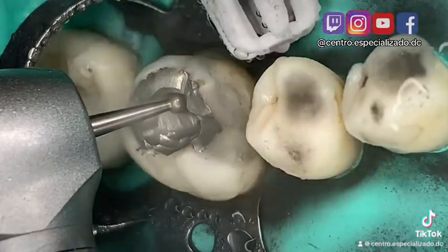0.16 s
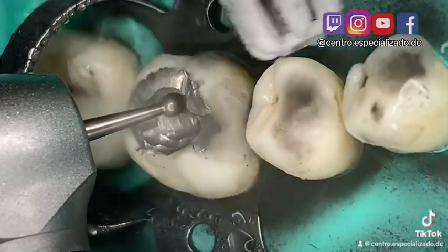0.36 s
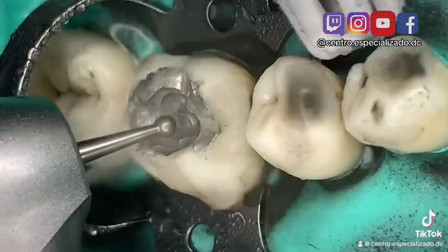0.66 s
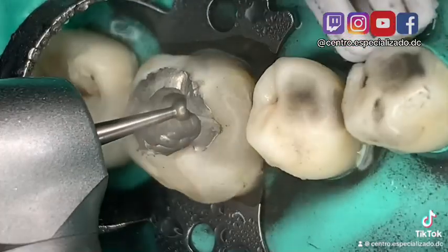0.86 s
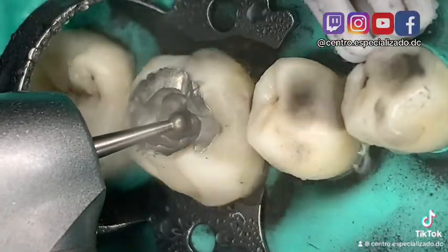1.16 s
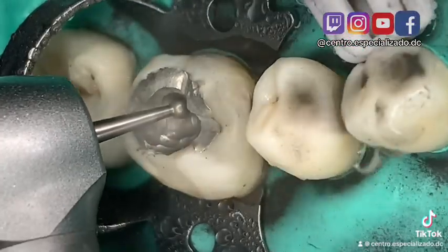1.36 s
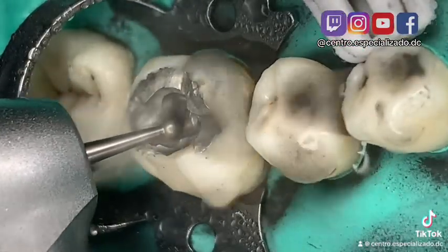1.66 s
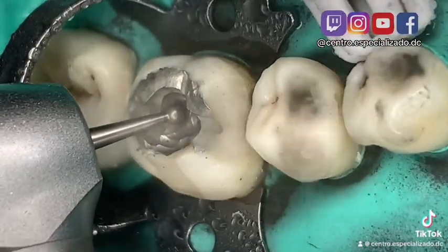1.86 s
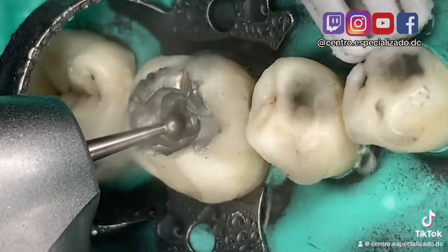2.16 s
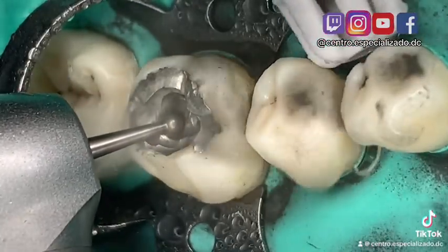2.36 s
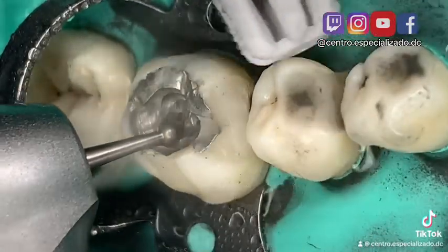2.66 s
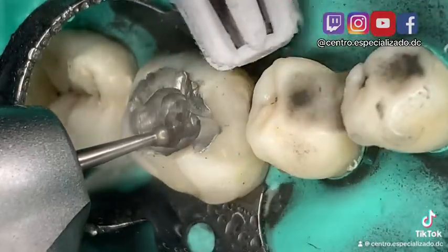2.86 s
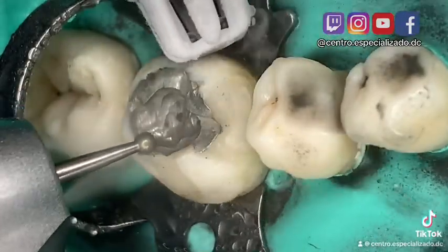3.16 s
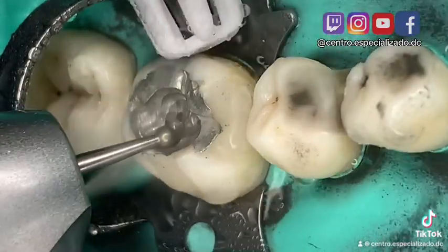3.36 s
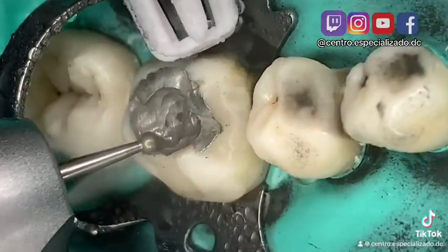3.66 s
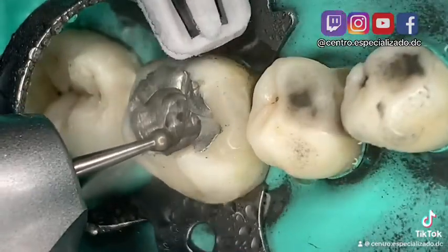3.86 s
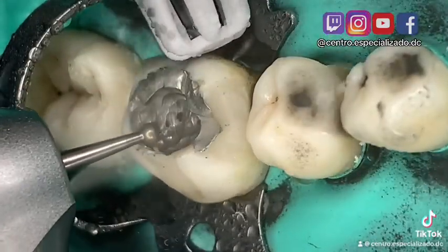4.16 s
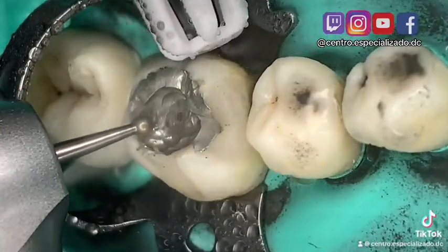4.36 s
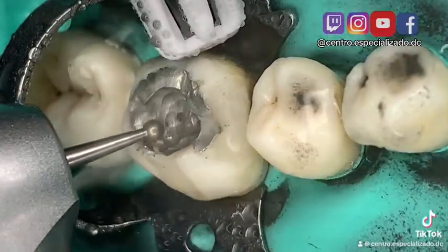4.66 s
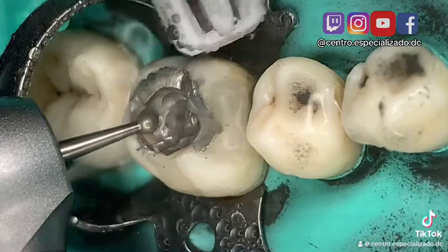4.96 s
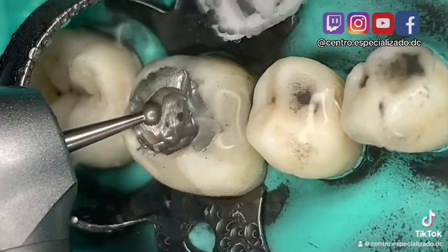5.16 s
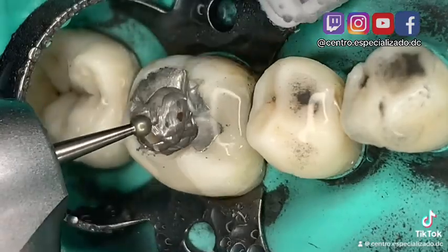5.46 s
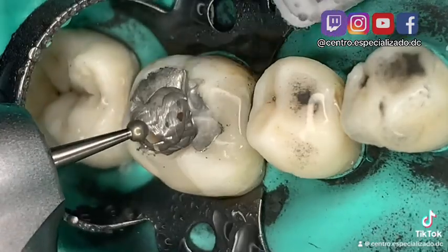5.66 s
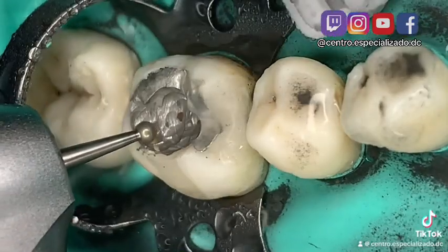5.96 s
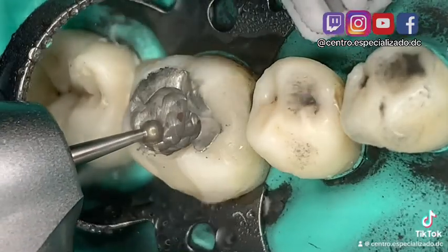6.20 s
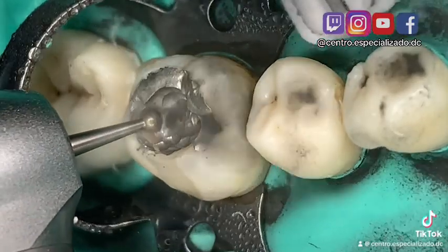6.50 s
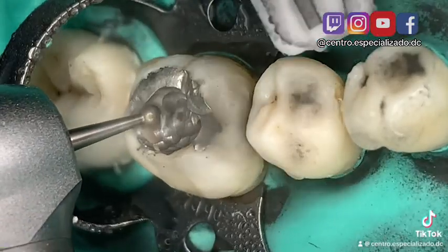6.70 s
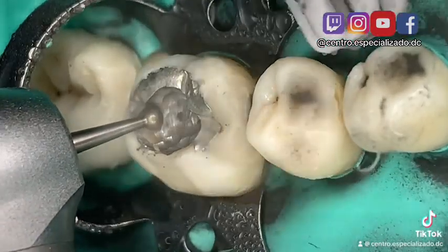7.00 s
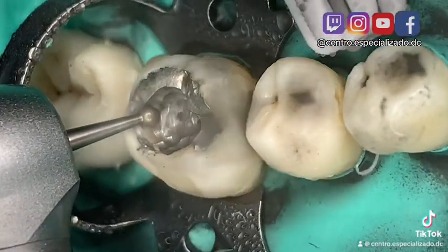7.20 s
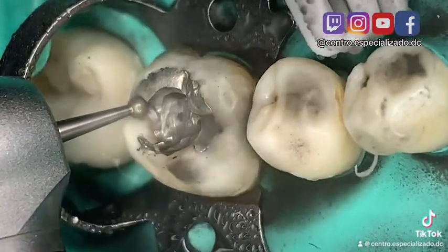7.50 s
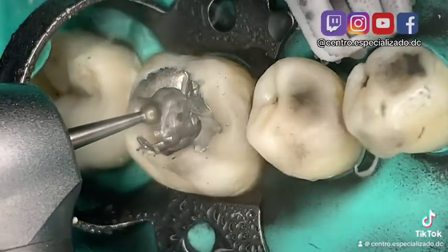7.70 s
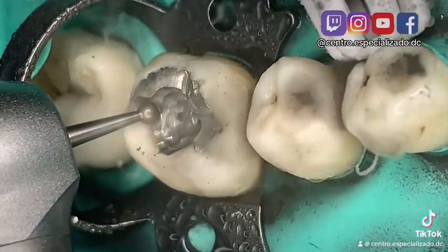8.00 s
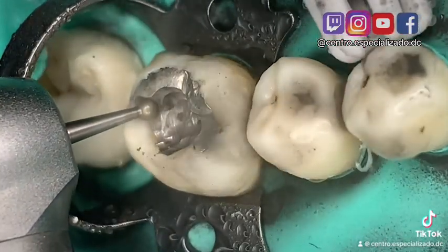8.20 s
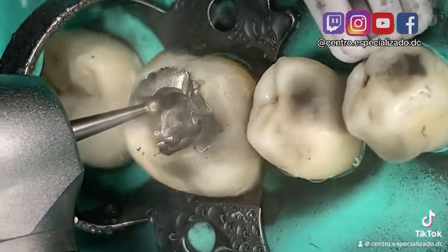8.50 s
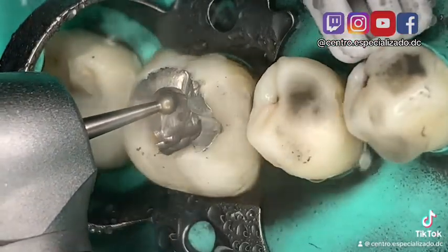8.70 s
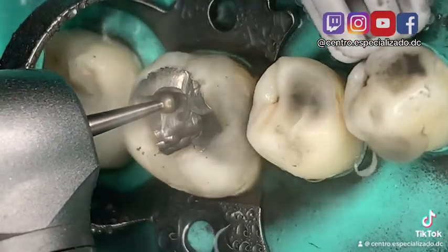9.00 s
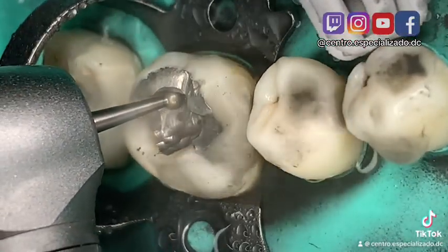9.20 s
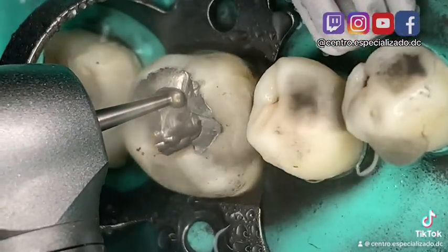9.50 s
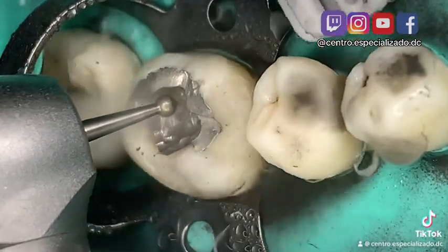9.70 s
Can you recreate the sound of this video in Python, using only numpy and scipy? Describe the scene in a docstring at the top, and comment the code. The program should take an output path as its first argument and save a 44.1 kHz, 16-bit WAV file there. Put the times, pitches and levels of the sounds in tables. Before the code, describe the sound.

Close stereo sound of a dental air turbine grinding a metal filling in a clinic. A very high thin whine dips and rises with each stroke over bright spray hiss. Near five seconds pitch and hiss sag together, then surge back louder. A suction tip slurps wetly with small snaps, and a faint machine hum stays low behind.

```python
"""A high whine sags and recovers over a bright hiss, with wet slurps, small snaps and a low hum behind it.
A dental air turbine grinds an old filling out of a molar, heard close by in stereo.
The rotor whines once a turn, slows with each stroke of the bur, coasts down when the pedal is eased and
spins up again. Shaped noise makes the air and water spray and the rush of air leaving the rotor.
Random drops ring the suction tip and its tube; sine waves make the machine hum and the soft bumps."""
import sys
import numpy as np
from scipy import signal
from scipy.fft import rfft, irfft
from scipy.io import wavfile
from scipy.ndimage import uniform_filter1d, map_coordinates

SR = 44100
rng = np.random.default_rng(int(sys.argv[2]) if len(sys.argv) > 2 else 0)


def file_out(sig):
    """Save sig as 16-bit WAV at sys.argv[1]."""
    # one column per channel
    cols = np.atleast_2d(sig).T
    # limit, then scale
    lim = np.clip(cols, -1, 1)
    pcm = np.round(lim * 32767).astype(np.int16)
    wavfile.write(sys.argv[1], SR, pcm)


N = 434385
TIME = np.arange(N) / SR  # seconds
FREQ = np.maximum(np.fft.rfftfreq(N, 1 / SR), 1)  # Hz, kept above zero for logs and divisions

# cooling air and water jet, which sags and surges with the pedal; each user adds its own offset:
# (time [s], level [dB])
JET_LEVEL = [(0, -33), (3.2, -33), (4.75, -35.5), (5.13, -42.5), (5.45, -46), (5.61, -42.5), (5.79, -37),
             (6.37, -26.5), (6.9, -28.5), (7.6, -29.5), (8.6, -31.5), (9.85, -31.5)]
# water drawn into the suction tip: (time [s], level [dB])
SUCTION_LEVEL = [(0, -57.5), (4.3, -57.5), (5.4, -60.5), (5.9, -53), (6.55, -49.5), (6.85, -51.5),
                 (7.7, -53.5), (7.9, -55.5), (9.85, -55)]


def undb(db):
    """Turn decibels into a gain."""
    return 10 ** (np.asarray(db) / 20)


def unit(x):
    """Scale to an rms of 1."""
    return x / np.sqrt(np.mean(x ** 2))


def curve(rows):
    """Join (time, value) rows by straight lines."""
    return np.interp(TIME, *np.transpose(rows))


def shape(rows):
    """Gain at every frequency from (Hz, dB) rows, joined on a logarithmic pitch scale."""
    hz, db = np.transpose(rows)
    return undb(np.interp(np.log(FREQ), np.log(hz), db))


def filtered(x, response):
    """Apply a frequency response."""
    return irfft(rfft(x) * response, N)


def resonances(modes):
    """Add up resonances from (Hz, width Hz, dB) rows, with alternating sign."""
    total = 0
    for k, (hz, width, db) in enumerate(modes):
        detune = (FREQ / hz - hz / FREQ) * hz / width
        total = total + (-1) ** k * undb(db) / (1 + 1j * detune)
    return total


def walk(rate):
    """Smooth random wandering of rms 1 that changes about rate times a second."""
    steps = rng.standard_normal(8192)
    # work out every 16th sample and hold it
    coarse = map_coordinates(steps, [TIME[::16] * rate], order=3, mode="wrap")
    return unit(coarse.repeat(16)[:N])


def droplets(rate, spread_db):
    """Two rows of random impacts, rate per second, a few of them much larger than the rest."""
    size = undb(spread_db * np.minimum(rng.exponential(size=(2, N)), 5))
    lands = rng.random((2, N)) < rate / SR
    return unit(lands * size * rng.choice([-1, 1], (2, N)))


def strikes(rows, response):
    """One impulse per (time s, peak dB) row, rung through a response."""
    hits = np.zeros(N)
    for s, db in rows:
        hits[int(s * SR)] += undb(db)
    ring_peak = np.abs(irfft(response, N)).max()
    return filtered(hits, response) / ring_peak


def swells(rows):
    """Sum of flat-topped swells from (time s, half length s, level dB, ..) rows."""
    total = 0
    for s, length, db, *_ in rows:
        age = (TIME - s) / length
        total = total + undb(db) * np.exp(-age ** 4 / 2)
    return total


def stereo(main, second=None):
    """Place a sound in stereo; a second independent noise makes left and right less alike, by frequency."""
    # stereo image at each frequency, lead, likeness and balance of the two channels:
    # (frequency [Hz], left lead [radians], likeness [0-1], left minus right [dB])
    image_rows = [(100, .25, .95, -.5), (600, .35, .88, -4), (1750, .1, .93, -1.7), (2350, 1.5, .45, -6),
                  (2900, 3.14, .9, -.3), (3500, 1.3, .55, -1), (4900, 3.1, .65, -3.2),
                  (6500, 5.85, .96, .6), (7600, 6.35, .97, 0), (8500, 7.9, .75, 0), (9400, 9.35, .995, 0),
                  (10100, 9.5, .995, 0), (11000, 11, .6, 0), (11800, 12.5, .99, 0), (13300, 12.8, .92, 0),
                  (13800, 13.9, .55, 0), (14400, 15.7, .999, 0)]
    hz, *columns = np.transpose(image_rows)
    lead, alike, balance_db = (np.interp(FREQ, hz, c) for c in columns)
    side = np.array([[1], [-1]])  # left, right
    spectrum = rfft(main)
    if second is not None:
        shared = spectrum * np.sqrt((1 + alike) / 2)
        opposite = side * rfft(second) * np.sqrt((1 - alike) / 2)
        spectrum = shared + opposite
    right_lag = np.exp(-1j * lead * np.array([[0], [1]]))
    return irfft(spectrum * undb(side * balance_db / 2) * right_lag, N)


def braking():
    """Speed in Hz that the strokes take from the rotor: each bites, holds and lets go."""
    # strokes of the bur on the filling:
    # (start [s], end [s], drop in speed [Hz], time to bite [s], time to let go [s])
    stroke_rows = [(-0.365, 0.482, 931, 0.095, 0.216), (0.952, 1.093, 798.5, 0.119, 0.16),
                   (1.448, 1.746, 427, 0.087, 0.12), (1.985, 2.071, 772.6, 0.112, 0.17),
                   (2.39, 2.497, 445, 0.092, 0.153), (2.789, 3.104, 162.1, 0.108, 0.14),
                   (3.335, 3.465, 77, 0.021, 0.12), (3.57, 3.65, 241.2, 0.081, 0.1),
                   (3.847, 4.951, 215, 0.078, 0.088), (4.276, 4.479, 117.2, 0.213, 0.091),
                   (6.478, 6.768, 1064, 0.158, 0.21), (7.189, 7.606, 660, 0.122, 0.18),
                   (7.953, 8.714, 387.7, 0.148, 0.12), (8.988, 9.657, 495, 0.069, 0.12)]
    total = 0
    for start, end, drop_hz, bite, release in stroke_rows:
        bitten = np.tanh((TIME - start) / bite)
        let_go = np.tanh((TIME - end) / release)
        total = total + drop_hz * (bitten - let_go) / 2
    return total


def rotor_speed(spin_lag_s=0.102):
    """Turns per second: the pedal's speed, rounded off by inertia, less the braking of the bur."""
    # unloaded rotor as the pedal is eased and pressed again: (time [s], turns per second [Hz])
    free_speed = [(-0.0, 6843), (4.74, 6748), (4.95, 5886), (5.48, 4690), (5.75, 4570), (5.95, 4800),
                  (6.23, 6130), (6.57, 7000), (9.85, 6927)]
    rounded = uniform_filter1d(curve(free_speed), size=int(spin_lag_s * SR), mode="nearest")
    return rounded - braking()


def turbine(speed, jitter=0.00055, wander=0.000603, flutter_db=1.0, chatter_db=0.85, whine_db=0,
            octave_db=-52, squeal_db=0, squeal_waver_db=-2.0, quiet_half_width_hz=125):
    """Rotor unbalance sings once a turn; the bur catching on the filling shakes speed and level."""
    # whine outside its quiet band of speed: (time [s], level [dB])
    whine_level = [(0, -40.5), (.2, -39.5), (.33, -45.5), (.46, -33), (1.02, -33), (1.1, -37), (1.3, -34),
                   (1.62, -31), (1.8, -39), (2.03, -27.5), (2.18, -36), (2.55, -30.5), (2.85, -34),
                   (3.25, -30), (3.5, -33), (3.8, -28), (4.05, -33.5), (4.8, -34.5), (5.08, -37),
                   (5.43, -51), (5.6, -44.5), (5.93, -44), (6.08, -30), (6.18, -30.5), (6.24, -35),
                   (6.55, -35.5), (6.78, -25), (7.15, -28.5), (7.4, -30), (8.27, -27.5), (8.9, -30),
                   (9.2, -25.5), (9.85, -31.5)]
    # drifting narrow band of speed where the whine weakens: (time [s], centre [Hz], depth [dB])
    quiet_speed = [(0.0, 6633, -12), (0.6, 6636, -8.5), (1.3, 6707, -6.5), (1.9, 6655, -8),
                   (2.8, 6678, -9.5), (3.7, 6655, -22), (4.66, 6567, -11), (6.8, 6530, -21),
                   (7.3, 6450, -21), (7.55, 6533, -7.5), (8.3, 6533, -7.5), (9.85, 6503, -5)]
    # the bur bites hard and squeals an octave above the whine: (time [s], half length [s], level [dB])
    squeal_rows = [(.98, .04, -49), (1.36, .04, -52), (1.575, 0.042, -42), (2.07, .07, -53),
                   (2.44, 0.056, -53), (4.22, 0.25, -48), (4.65, .07, -51), (4.86, .02, -47),
                   (6.4, .1, -44), (7.23, .03, -43), (7.4, .08, -49), (8.0, .22, -61), (9.52, 0.056, -45)]

    # jitter and wander are fractions of the speed
    shaken_speed = speed * (1 + jitter * walk(70) + wander * walk(14))
    phase = 2 * np.pi * np.cumsum(shaken_speed) / SR
    times, *columns = np.transpose(quiet_speed)
    quiet_hz, depth_db = (np.interp(TIME, times, c) for c in columns)
    detune = (speed - quiet_hz) / quiet_half_width_hz
    fade = np.sqrt((detune ** 2 + undb(depth_db) ** 2) / (detune ** 2 + 1))
    level_db = curve(whine_level) + whine_db + flutter_db * walk(45)
    tone = fade * undb(level_db) * np.sin(phase)

    # a faint octave dies away quickly as the rotor slows, and flares up when the bur squeals
    faint = undb(octave_db) * (speed / speed.max()) ** 10
    squeal = swells(squeal_rows) * undb(squeal_db + squeal_waver_db * walk(25))
    octave = (faint + squeal) * np.sin(2 * phase)
    chatter = undb(chatter_db * walk(400))
    return stereo(np.sqrt(2) * (tone + octave) * chatter)


def exhaust(speed, rest_hz=3300, rise=.55, half_width_hz=430, exhaust_db=-12):
    """Air leaving the rotor rushes in a narrow band that sinks as the rotor slows."""
    low_pass = 1 / (1 + (FREQ / half_width_hz) ** 4)
    rush = unit(filtered(rng.standard_normal((2, N)), low_pass))
    # two slow noises on a cosine and a sine make a noise band around the moving pitch
    phase = 2 * np.pi * np.cumsum(rest_hz + rise * speed) / SR
    band = rush[0] * np.cos(phase) + rush[1] * np.sin(phase)
    return stereo(band * undb(curve(JET_LEVEL) + exhaust_db))


def spray(mist=0.2, flicker_db=0.61, jet_db=-1.05, split_hz=10500, linger=0.28, fizz_db=0,
          fizz_flicker_db=1.0):
    """The jet hisses, its mist patters on the tooth and chips snap off the bur."""
    # colour of the jet, before the bass is thinned: (frequency [Hz], relative level per Hz [dB])
    jet_colour = [(3000, -23), (5000, -13.3), (5450, -7), (6050, -5.7), (6600, -1.3), (7300, -1.3),
                  (7850, -3.5), (8400, .6), (8950, .5), (9600, -3.4), (11400, -3.6), (13000, -1.8),
                  (13800, -4), (14600, -4.5), (15400, -7)]
    # chips flicked off by the bur: (time [s], peak [dB])
    chip_rows = [(7.479, -5), (7.505, -19), (7.539, -10), (7.653, -13), (7.680, -13), (7.712, -23)]

    jet = rng.standard_normal((2, N)) + mist * droplets(rate=4000, spread_db=2.5)
    # so small a nozzle radiates little bass
    colour = shape(jet_colour) * np.minimum(FREQ / 3000, 1) ** 0.67
    hiss = unit(filtered(jet, colour))
    air = filtered(hiss, 1 / (1 + (FREQ / split_hz) ** 8))
    # when the air pressure sags, the fine fizz on top fades less than the rush below it
    level_db = curve(JET_LEVEL)
    sag_db = np.maximum(np.median(level_db) - level_db, 0)
    fizz = (hiss - air) * undb(fizz_db + linger * sag_db + fizz_flicker_db * walk(70))
    gain = undb(level_db + jet_db + flicker_db * walk(25))
    return stereo(*(air + fizz) * gain) + stereo(strikes(chip_rows, colour))


def suction(wet=0.22, gurgle_db=1.16, suction_db=0.0):
    """Air and torn-up water ring the tip and the mouth; single drops snap in the tip."""
    # resonances of the tip and the mouth around it: (frequency [Hz], width [Hz], level [dB])
    mouth_modes = [(410, 360, -6), (790, 235, -1), (996, 470, -3), (1570, 316, -3), (2586, 440, -0.5),
                   (3237, 180, 3.5), (4484, 880, 3.5)]
    # single drops snapping in the suction tip: (time [s], peak [dB])
    drop_rows = [(2.578, -37), (3.265, -34), (3.281, -30), (4.220, -27.5), (4.430, -26), (4.462, -29),
                 (4.474, -29), (6.135, -27), (6.385, -36), (6.900, -29), (7.645, -30), (7.670, -40)]

    mouth = resonances(mouth_modes)
    air = np.sqrt(1 - wet) * rng.standard_normal((2, N))
    water = np.sqrt(wet) * droplets(rate=1500, spread_db=2.5)
    # the level is that of the midrange, below the hiss
    mid_gain = np.sqrt(np.mean(np.abs(mouth) ** 2 * (FREQ < 2700)))
    gain = undb(curve(SUCTION_LEVEL) + suction_db + gurgle_db * walk(60))
    draw = filtered(air + water, mouth / mid_gain) * gain
    return stereo(*draw) + stereo(strikes(drop_rows, mouth))


def clinic(rumble_db=-61.5, follow=1.0, hum_follow=0.57, waver_db=1.75):
    """A wavering machine hum over a rumble; both grow with the suction flow."""
    # colour of the room rumble: (frequency [Hz], relative level per Hz [dB])
    room_colour = [(25, -33), (40, -9), (58, 0), (85, -6.5), (120, -3), (170, -3), (260, -8.5), (400, -14),
                   (800, -12.5), (3000, -57)]
    # machine hum at average suction flow: (frequency [Hz], level [dB])
    hum_tones = [(58.5, -74), (120, -77), (172.1, -68), (178.2, -78), (229.4, -72.5), (286.5, -75.5),
                 (315, -81), (400.6, -79.5)]

    flow_db = curve(SUCTION_LEVEL) - curve(SUCTION_LEVEL).mean()
    rumble = unit(filtered(rng.standard_normal((2, N)), shape(room_colour)))
    rumble = rumble * undb(rumble_db + follow * flow_db)
    hum = np.zeros(N)
    for hz, db in hum_tones:
        level = np.sqrt(2) * undb(db + waver_db * walk(9))
        hum += level * np.sin(2 * np.pi * hz * TIME + 0.24 * walk(5))
    return stereo(rumble[0] + hum * undb(hum_follow * flow_db), rumble[1])


def slurps(sputter_db=2.45, slurp_db=0, slosh=.025):
    """Gulps of water, torn into drops, ring the tube like an open pipe; the sloshing retunes it."""
    # gulps going up the tube: (time [s], half length [s], level [dB], lowest tube resonance [Hz])
    gulp_rows = [(.42, 0.018, -53, 805), (2.602, 0.019, -51.5, 818), (3.066, 0.035, -54.5, 804),
                 (3.212, 0.08, -52, 802), (4.43, 0.043, -57, 817), (6.382, 0.016, -45.5, 814),
                 (6.949, 0.06, -44.5, 826), (7.466, 0.022, -49, 807), (7.551, 0.042, -44, 794),
                 (7.665, 0.046, -42.5, 851), (8.623, 0.037, -53, 820)]
    # resonances of the suction tube before retuning: (frequency [Hz], width [Hz], level [dB])
    tube_modes = [(816.5, 143, -2), (1600, 170, -2), (2530, 330, 0), (3220, 400, -1.5), (4100, 520, -1)]

    ring = unit(filtered(droplets(rate=2200, spread_db=1.0), resonances(tube_modes)))
    lowest_hz = curve([(s, hz) for s, _, _, hz in gulp_rows])
    tuning = lowest_hz / tube_modes[0][0] * (1 + slosh * walk(25))
    # reading the ringing faster or slower raises or lowers its pitch
    place = np.cumsum(tuning)
    ring = np.array([map_coordinates(row, [place], order=3, mode="wrap") for row in ring])
    gain = swells(gulp_rows) * undb(slurp_db + sputter_db * walk(70))
    return stereo(*ring * gain)


def bumps(rise_cycles=.9):
    """Light bumps reach the microphone as low thuds that swell and die within a few cycles."""
    # soft handling bumps: (time [s], envelope peak [dB], pitch [Hz])
    bump_rows = [(6.016, -41, 78), (6.068, -41, 104), (6.094, -39, 70), (6.185, -49, 200),
                 (6.352, -46, 215), (6.360, -46, 135), (6.384, -43, 170), (6.408, -47, 85),
                 (6.55, -49, 150)]
    out = np.zeros(N)
    age = TIME[:SR // 4]  # each thud gets a quarter second
    for s, db, hz in bump_rows:
        swell = age * hz / rise_cycles
        envelope = undb(db) * (swell * np.exp(1 - swell)) ** 2
        start = int(s * SR)
        out[start:start + len(age)] += envelope * np.sin(2 * np.pi * hz * age)
    return stereo(out)


def scene():
    """Turbine, spray, suction and bumps in the clinic."""
    speed = rotor_speed()
    return turbine(speed) + exhaust(speed) + spray() + suction() + clinic() + slurps() + bumps()


def record(dry, top_hz=15650):
    """The recorder cuts the top steeply."""
    low_pass = signal.ellip(12, .1, 80, top_hz, fs=SR, output="sos")  # .1 dB ripple, 80 dB cut
    return signal.sosfilt(low_pass, dry)


dry = scene()
out = record(dry)
file_out(out)
```